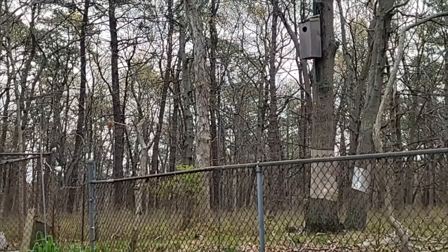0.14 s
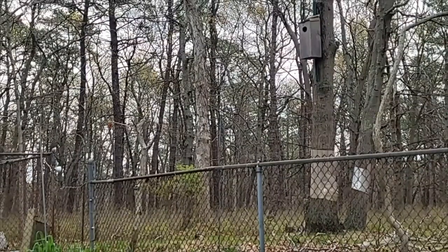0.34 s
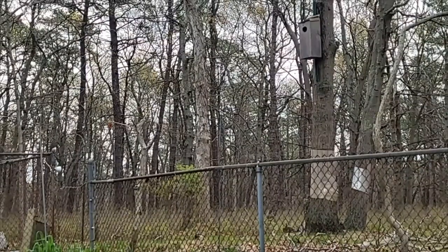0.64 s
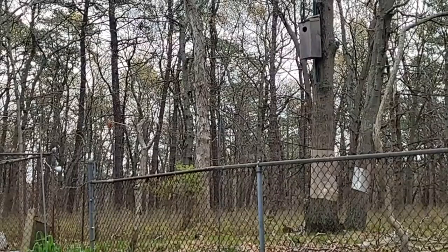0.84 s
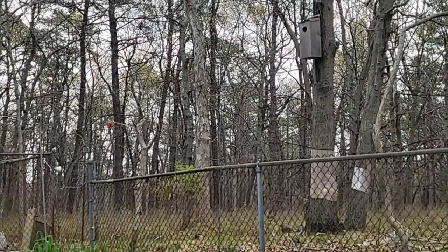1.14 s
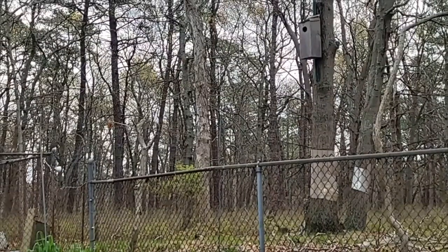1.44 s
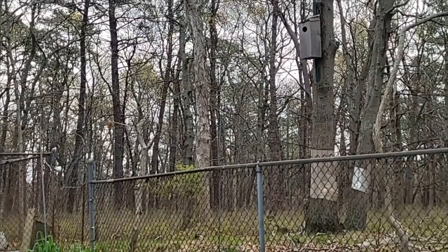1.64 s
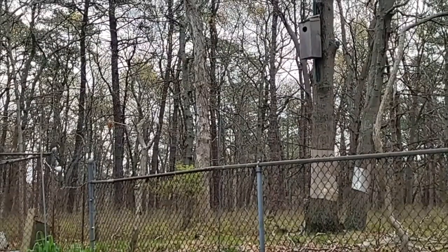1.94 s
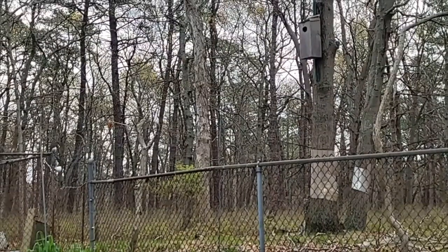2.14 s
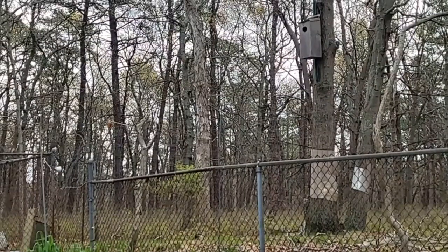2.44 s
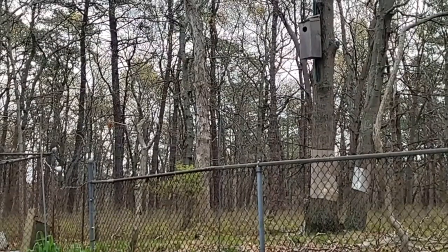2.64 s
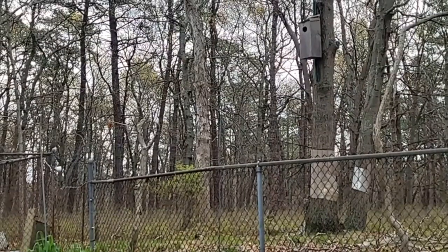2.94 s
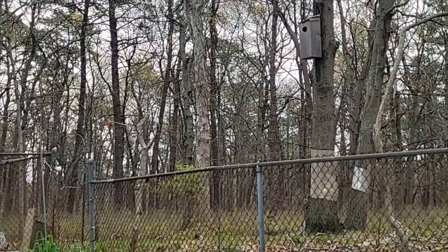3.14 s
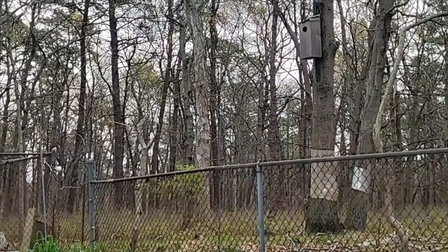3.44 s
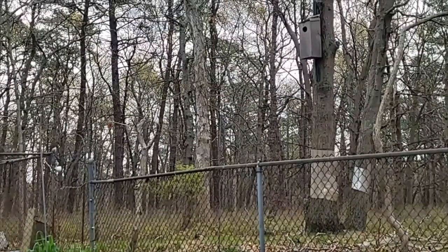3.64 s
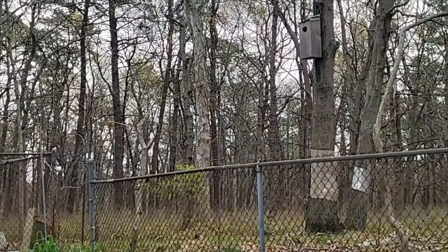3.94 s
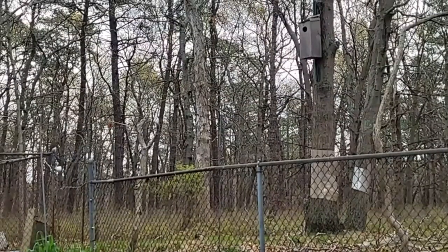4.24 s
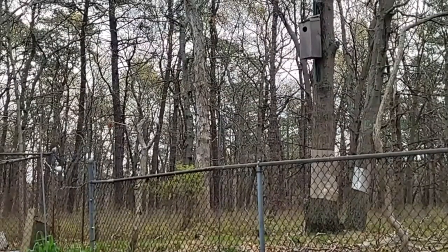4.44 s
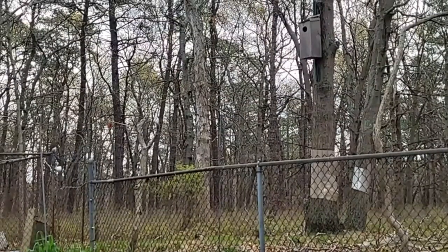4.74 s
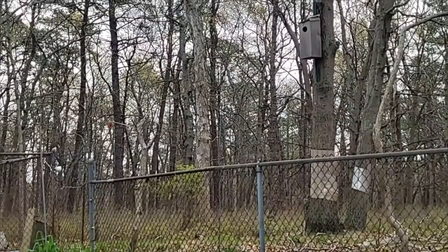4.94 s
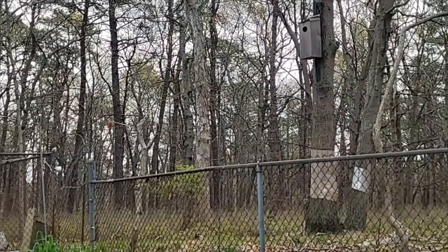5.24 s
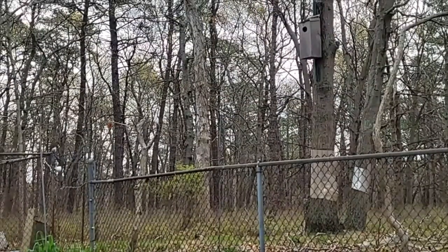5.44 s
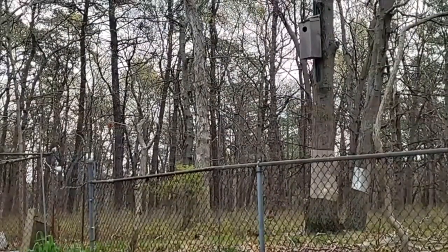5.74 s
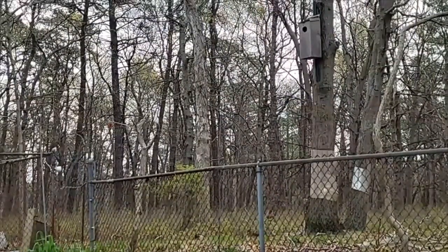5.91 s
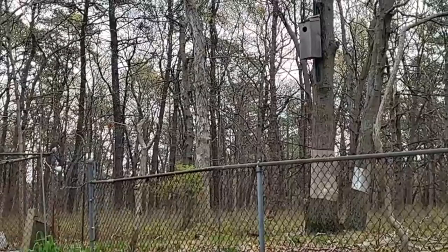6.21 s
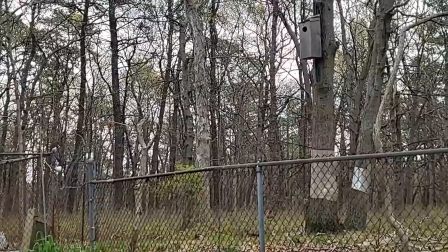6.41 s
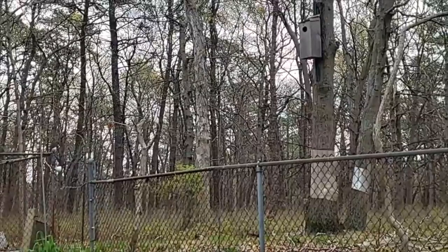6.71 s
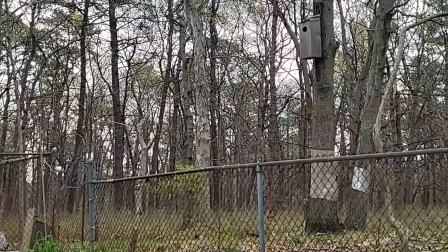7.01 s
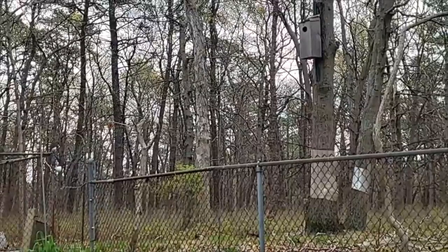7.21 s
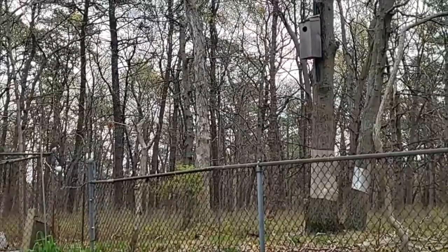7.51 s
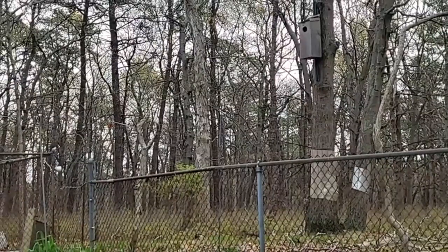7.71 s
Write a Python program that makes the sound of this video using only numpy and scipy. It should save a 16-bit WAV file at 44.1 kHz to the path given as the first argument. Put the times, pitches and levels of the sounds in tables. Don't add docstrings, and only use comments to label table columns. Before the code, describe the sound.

Outdoors in woods, a songbird repeats a fast, clear whistled phrase about twice a second, blurred by tree echoes. Two small metallic clicks sound near the microphone early on. The song stops and a second bird chips faintly and steadily. Later the song returns while cloth brushes dry leaves close by, with snaps, ticks and dull knocks on the recorder. Low road rumble, a distant machine hum and faint hiss continue throughout.

```python
import sys
import numpy as np
from scipy import signal
from scipy.fft import rfft, irfft, next_fast_len
from scipy.io import wavfile
from scipy.ndimage import uniform_filter1d, map_coordinates

SR = 44100
rng = np.random.default_rng(int(sys.argv[2]) if len(sys.argv) > 2 else 0)


def pcm_store(signal):
    levels = np.round(np.clip(np.atleast_2d(signal), -1, 1) * 32767)
    wavfile.write(sys.argv[1], SR, levels.astype(np.int16).T)


def volts_from_db(level):
    exponent = np.asarray(level, float) / 20
    return 10 ** exponent


N = 347061

# start_s, swoop_db, high_db, held_db, fall_db
SONG_PHRASES = [(-.085, -79.5, -70, -67, -66), (.385, -72, -64.5, -62, -66), (.853, -67, -62.5, -62.5, -66),
                (1.321, -66.5, -61, -62, -64.5), (5.142, -85, -75, -68, -66.5),
                (5.613, -65, -62.5, -64.5, -69), (6.083, -64.5, -64.5, -62.5, -66.5),
                (6.550, -65, -63, -61, -68)]
# after_start_s, pitch_hz, level_db
HOOK_NOTE = [(0, 4400, -8), (.011, 5400, -6), (.018, 5460, -4), (.032, 5430, -8)]
STROKE_NOTES = [
    [(.022, 5150, -8), (.036, 4850, -8)],
    [(.038, 4750, -7), (.058, 4250, -2), (.078, 3880, -1.5)],
    [(.072, 4520, -4), (.084, 4230, -2), (.098, 3800, -3)],
    [(.085, 3650, -4), (.094, 3320, -2), (.112, 3100, -4)],
    [(.096, 3780, -2), (.106, 3540, 1), (.126, 3200, -4)],
]
HIGH_NOTE = [(.15, 3620, -3), (.159, 3610, 2), (.17, 3560, -3), (.184, 3520, -13)]
HELD_NOTE = [(.196, 2670, -18), (.222, 2722, -2), (.24, 2738, -6), (.265, 2748, 2), (.28, 2750, -2)]
FLICK_NOTES = [
    [(.298, 3300, -4), (.306, 3050, 0), (.316, 2850, -3)],
    [(.316, 3250, -5), (.326, 2980, -2), (.338, 2800, -5)],
]
FALL_NOTE = [(.342, 2570, -3), (.354, 2480, 3.5), (.385, 2345, 0), (.415, 2265, -1.5), (.44, 2225, -4.5),
             (.46, 2195, -12)]
OVERTONE_DB = -32
SWOOP_FLUTTER_DB, SWOOP_ECHO_DB, SWOOP_TAIL_DB, SWOOP_RING = 3, -4, 3, 1
SONG_FLUTTER_DB, SONG_ECHO_DB, SONG_TAIL_DB, SONG_RING = 3.6, -5, -4.5, 1
FLICK_DB, FALL_DB, FALL_FLUTTER_DB = -5.5, -7.3, 3.5

# delay_s, level_db
TRUNK_ECHOES = [(.009, -11), (.03, -11), (.062, -10), (.09, -10), (.14, -8)]
# freq_hz, t60_s
WOODS_DECAY = [(2200, .8), (2750, 1.1), (3600, .98), (5000, 1.05), (9000, 0.36)]
SWAY_S, LEAF_RATE_HZ = .00005, 260

# freq_hz, density_db_per_hz
ROAD_SPECTRUM = [(12, -55), (20, -31), (35, -11), (50, -3), (66, -1.5), (164, -8.5), (191, -14),
                 (261, -15.5), (318, -18.5), (442, -26), (800, -26.5), (1940, -49.5), (2100, -65.5),
                 (2730, -86), (4620, -120)]
# time_s, level_db
WASH_LEVEL = [(0, -62), (.1, -58.5), (.45, -61), (.9, -60.5), (2, -61), (2.7, -60.5), (3.05, -61.5),
              (3.15, -62.5), (3.35, -61), (3.9, -59.5), (4.8, -61), (5.4, -59), (5.6, -56), (5.8, -56.5),
              (5.95, -60.5), (6.4, -61.5), (7.35, -60), (7.47, -64), (7.87, -60.5)]
# freq_hz, width_hz, level_db
ENGINE_TONES = [(69.54, 16, -57), (109.7, 5.4, -63.5), (263.4, 7, -68.5), (312.7, 8, -71.5)]
WASH_DB, RUMBLE_DB, RUMBLE_GROWS = .9, -54, .8
LORRY_DB, LORRY_T60_S, LORRY_HZ, LORRY_WIDTH_HZ = -45, 4.5, 69, 22

# time_s, pitch_hz, level_db, third_multiple_db
HUM_TRACK = [(0, 158.5, -62, -78), (1.3, 158, -60, -76), (2.5, 157.8, -66, -78), (2.85, 157.4, -57, -78),
             (3.4, 156.8, -57, -71), (3.6, 156, -54, -78), (4.25, 155.3, -49.5, -71),
             (4.8, 155.4, -56, -78), (5.1, 155.5, -52, -74), (5.65, 155.4, -44, -65),
             (6.14, 154.8, -60, -76), (6.42, 153.8, -61, -62), (6.6, 153, -57, -73),
             (7.15, 152.7, -53, -71), (7.45, 152.8, -63, -78), (7.69, 152.6, -50, -73),
             (7.87, 152.8, -54, -73)]
# freq_hz, density_db_per_hz
AIR_SPECTRUM = [(1180, -29), (2000, -1), (2440, -7), (2610, -5), (2910, -8), (3970, -5), (4550, -10),
                (6920, -3), (7530, -7), (9910, -9), (11500, -13), (12800, -7.5), (14300, -11), (15500, -19)]
AIR_DB = -85.5

# start_s, length_s, centre_hz, width_hz, level_db
CLOTH_BRUSHES = [(0, .07, 4100, 600, -82), (.26, .1, 6500, 4000, -83), (.725, .05, 6850, 500, -80),
                 (.824, .012, 3100, 900, -68), (2.32, .36, 6950, 1500, -91), (2.3, .55, 12500, 4000, -94),
                 (4.208, .028, 4200, 1800, -75.5), (4.868, .135, 3800, 900, -70.5),
                 (4.9, .06, 4500, 600, -76), (4.86, .12, 6500, 2000, -80), (7.44, .06, 3400, 450, -84),
                 (7.41, .09, 6700, 2000, -82), (7.615, .05, 6300, 2500, -81), (7.72, .14, 6800, 2200, -80),
                 (7.855, .014, 9000, 9000, -73)]
# freq_hz, density_db_per_hz
CLOTH_SPECTRUM = [(710, -26), (1200, 0.5), (1300, -4), (1540, -9.5), (1940, -11.5), (2260, -12.5),
                  (3390, -8), (5300, -10), (7180, -4.5), (8830, -22.5), (13000, -13), (14400, -23.5)]
# start_s, peak_db, centre_hz
LEAF_SNAPS = [(7.259, -57, 9000), (5.456, -51, 7000), (5.885, -53, 2000), (5.368, -50, 3900),
              (4.5328, -52, 7640), (5.4455, -50, 2990), (5.5194, -54, 7200), (5.7513, -37, 12500),
              (5.7694, -43, 3570), (6.828, -45, 2750), (7.0983, -51, 2750), (7.6196, -57, 6330),
              (7.799, -47, 7240)]
SNAP_T60_S = .055
# start_s, peak_db, centre_hz, t60_s
HOUSING_KNOCKS = [
    (5.445, -49.5, 650, .03),
    (5.61, -57, 900, .03),
    (5.752, -49, 600, .03),
    (5.934, -47, 1100, .03),
    (5.9432, -36, 780, .035),
]
NEAR_TOP_HZ = 14300

# start_s, length_s, from_hz, to_hz, level_db
THIN_CALLS = [(.012, .053, 3560, 3490, -80), (3.412, .035, 7450, 6450, -74), (5.28, .085, 3560, 3450, -79),
              (5.715, .04, 7300, 7150, -77), (5.752, .03, 6750, 6650, -72), (4.26, .022, 3580, 3530, -92),
              (4.6, .02, 2720, 2760, -91), (4.65, .03, 2640, 2630, -91), (4.655, .03, 5400, 5230, -86),
              (6.656, .03, 7300, 6600, -68)]
# length_share, top_pitch_share, level_db
ARCH_SHAPE = [(0, .96, -2), (.32, 1.001, 0), (.62, .966, 1.5), (1, .928, -1.5)]
# start_s, length_s, top_hz, level_db
ARCHED_CALLS = [
    (1.413, .079, 7920, -75),
    (5.822, .081, 7500, -72),
]
# after_start_s, pitch_hz, level_db
CHIP_NOTE = [(0, 5750, 0), (.006, 5350, 2.5), (.016, 4950, 3.5), (.03, 4680, 1), (.042, 4330, -3)]
# start_s, level_db
CHIP_TIMES = [(1.018, -78), (1.172, -80), (1.512, -80), (1.668, -74), (1.833, -79), (1.988, -77.5),
              (2.129, -74), (2.284, -75), (2.431, -73.5), (2.583, -74), (2.739, -74.5), (2.893, -75.5)]

# start_s, level_db, t60_s, hiss_db, hiss_t60_s
CLASP_CLICKS = [
    (.360, -52, 0.046, -26, 0.6),
    (0.466, -47.5, 0.052, -28, 0.45),
]
# freq_hz, level_db, t60_s
CLASP_MODES = [(3278, -59, 1.2), (4350, -27, 0.23), (5170, -19, 0.14), (5460, 3.5, 0.019),
               (6557, -26, 0.088), (7897, -16, 0.089), (8600, -28, 0.11), (9900, -28, 0.078),
               (12060, -30, 0.11), (12320, -19, 0.017), (12700, -27, 0.08), (14060, -19, 0.13)]
# freq_hz, density_db_per_hz
CHATTER_SPECTRUM = [(880, -71), (1500, -37), (2190, -16.5), (3420, -16.5), (5040, -4.5), (6260, -12),
                    (7640, -6.5), (8320, -18), (8800, -12.5), (14400, -15)]

# peak_s, peak_db, rise_20db_s, fall_20db_s, brightness_db
LEAF_MOVES = [(4.53, -90, .025, .2, 7), (4.74, -85, .25, .25, 9), (4.87, -76, .03, .4, 12),
              (5, -84, .2, .1, 8), (5.33, -80, .35, .3, 2.5), (5.46, -71, .1, .1, 6),
              (5.76, -66, .13, .08, 11), (5.72, -75, .3, .9, 5), (6.07, -70.5, .9, .36, 1.5),
              (6.83, -76, .015, .03, 12), (6.94, -77, .25, .25, 1.5), (7.04, -71, .03, .045, 11),
              (7.09, -71, .06, .04, 12), (7.28, -89, .15, .1, 6), (7.63, -89, .04, .3, 5),
              (7.82, -83, .3, .6, 5)]
# start_s, peak_db, centre_hz
TWIG_TICKS = [(4.8145, -58, 7000), (4.8534, -55, 12800), (4.8758, -57, 13000), (4.9512, -59, 7500),
              (5.0171, -56, 6500), (5.087, -60, 3000), (5.1767, -60, 6440), (5.192, -62, 7000),
              (5.2475, -60, 7010), (5.4226, -58, 5000), (5.6057, -60, 2200), (5.6806, -52, 6000),
              (5.9432, -54, 5000), (6.0467, -52, 6200), (6.3091, -59, 6200), (6.9197, -52, 4500),
              (6.997, -60, 4000), (7.036, -54, 7000)]
TICK_T60_S, TICK_AFTER_DB, TICK_AFTER_T60_S, TICK_BROAD = .014, -12, .04, .5

# from_s, to_s, pressure_before, pressure_after
LOST_SOUND = [
    (.23903, .25429, -.0042, -.0043),
    (2.24435, 2.25429, -.0027, -.0008),
    (4.24960, 4.25429, -.002, -.0098),
    (7.23635, 7.25429, -.0017, .0008),
]


def unit(x):
    return x / np.sqrt(np.mean(x ** 2) + 1e-20)


def along(points, hz):
    f, v = np.transpose(points)
    return np.interp(np.log(hz + 1), np.log(f + 1), v)


def curves(rows):
    s, *cols = np.transpose(rows)
    return [np.interp(np.arange(N) / SR, s, c) for c in cols]


def wobble(rate_hz):
    coarse = np.arange(0, N + 16, 16)
    knots = rng.standard_normal(int(N * rate_hz / SR) + 4)
    return np.interp(np.arange(N), coarse, map_coordinates(knots, [coarse * rate_hz / SR]))


def filtered(x, response):
    m = next_fast_len(len(x) + 8192)
    return irfft(rfft(x, m) * response(np.fft.rfftfreq(m, 1 / SR)), m)[:len(x)]


def noise(count, response):
    return filtered(rng.standard_normal(count), response)


def spectrum(points):
    return lambda f: volts_from_db(along(points, f))


def hump(centre_hz, width_hz):
    return lambda f: 1j * f * width_hz / (centre_hz ** 2 - f * f + 1j * f * width_hz)


def new_track():
    return np.zeros(N + SR)


def add(track, s, sound):
    at = round((s + .5) * SR)
    track[at:at + len(sound)] += sound


def trimmed(track):
    return track[SR // 2:][:N]


def whistle(note, overtone_db, flutter_db):
    s, hz, db = np.transpose(note)
    t = np.arange(s[0], s[-1], 1 / SR)
    ends = np.clip(np.minimum(t - s[0], s[-1] - t) / .004, 0, 1)
    rows = np.repeat([[0], [1]], len(t), axis=1)
    gust = map_coordinates(rng.standard_normal((2, 40)), [rows, [(t - s[0]) * 140] * 2])
    glide_hz = uniform_filter1d(np.interp(t, s, hz), size=200)
    phase = 2 * np.pi * np.cumsum(glide_hz * (1 + .004 * gust[0])) / SR
    level = volts_from_db(np.interp(t, s, db) + flutter_db * gust[1])
    return np.sqrt(2) * ends * level * (np.sin(phase) + volts_from_db(overtone_db) * np.sin(2 * phase))


def woods(sound, echo_db, tail_db, ring, swell_s):
    hz, t, z = signal.stft(rng.standard_normal(SR // 2 + 8000), SR, nperseg=256)
    decay = volts_from_db(-60 * t / (ring * along(WOODS_DECAY, hz)[:, None]))
    tail = signal.istft(z * decay * (1 - np.exp(-t / swell_s)), SR, nperseg=256)[1]
    answer = volts_from_db(tail_db) * tail / np.linalg.norm(tail)
    for s, db in TRUNK_ECHOES:
        answer[round((s + rng.normal(0, .0004)) * SR)] += volts_from_db(db + echo_db)
    k = np.arange(len(sound))
    flicker = map_coordinates(rng.standard_normal(500), [k * LEAF_RATE_HZ / SR])
    swayed = np.interp(k + SWAY_S * SR * flicker, k, sound)
    heard = signal.fftconvolve(swayed, answer)
    heard[:len(sound)] += sound
    return heard


def songbird():
    track = new_track()
    for start, swoop_db, high_db, held_db, fall_db in SONG_PHRASES:
        away, facing = np.zeros((2, SR))
        away_notes = [(note, swoop_db - 4.5, SWOOP_FLUTTER_DB) for note in [HOOK_NOTE, *STROKE_NOTES]]
        away_notes += [(note, fall_db + FLICK_DB, SWOOP_FLUTTER_DB) for note in FLICK_NOTES]
        away_notes += [(FALL_NOTE, fall_db + FALL_DB, FALL_FLUTTER_DB)]
        for note, db, flutter_db in away_notes:
            add(away, note[0][0], volts_from_db(db) * whistle(note, OVERTONE_DB, flutter_db))
        for note, db in [(HIGH_NOTE, high_db), (HELD_NOTE, held_db)]:
            add(facing, note[0][0], volts_from_db(db - 3) * whistle(note, OVERTONE_DB, SONG_FLUTTER_DB))
        away, facing = away[SR // 2:], facing[SR // 2:]
        add(track, start, woods(away, SWOOP_ECHO_DB, SWOOP_TAIL_DB, SWOOP_RING, swell_s=.004))
        add(track, start, woods(facing, SONG_ECHO_DB, SONG_TAIL_DB, SONG_RING, swell_s=.012))
    return trimmed(track)


def traffic():
    wash_db, = curves(WASH_LEVEL)
    rumble_db = RUMBLE_DB + RUMBLE_GROWS * (wash_db - wash_db.mean())
    road = spectrum(ROAD_SPECTRUM)
    split = lambda f: 1 / (1 + (f / 190) ** 6)
    rumble = unit(noise(N, lambda f: road(f) * np.sqrt(split(f))))
    wash = unit(noise(N, lambda f: road(f) * np.sqrt(1 - split(f))))
    tones = np.zeros(N)
    for hz, width_hz, db in ENGINE_TONES:
        tones += volts_from_db(db) * unit(noise(N, lambda f: hump(hz, width_hz)(f) ** 2))
    t = np.arange(2 * SR) / SR
    lorry = unit(noise(len(t), lambda f: hump(LORRY_HZ, LORRY_WIDTH_HZ)(f) ** 2))
    tones[:len(t)] += volts_from_db(LORRY_DB - 60 * t / LORRY_T60_S) * lorry
    rumble *= volts_from_db(rumble_db + 2.4 * wobble(7.8))
    wash *= volts_from_db(wash_db + WASH_DB + 1.2 * wobble(5))
    return rumble + wash + tones


def hum():
    hz, db, third_db = curves(HUM_TRACK)
    phase = 2 * np.pi * np.cumsum(hz + 1.6 * wobble(12)) / SR
    first = volts_from_db(db - .8 + 1.7 * wobble(14)) * np.sin(phase)
    third = volts_from_db(third_db - 4 + 2.4 * wobble(9)) * np.sin(3 * phase)
    return np.sqrt(2) * (first + third)


def air():
    hiss = unit(noise(N, spectrum(AIR_SPECTRUM)))
    return volts_from_db(AIR_DB + 1.1 + 0.17 * wobble(9)) * hiss


def cloth_brushes():
    track = new_track()
    for s, length, hz, width_hz, db in CLOTH_BRUSHES:
        stroke = np.linspace(0, 1, round(length * SR))
        band = noise(len(stroke), lambda f: hump(hz, width_hz)(f) ** 2)
        rough_db = 3 * uniform_filter1d(rng.standard_normal(len(band)), size=100) * 10
        add(track, s, volts_from_db(db) * unit(band * volts_from_db(rough_db)) * np.sin(np.pi * stroke) ** 0.81)
    return trimmed(track)


def far_birds():
    track = new_track()
    for s, db in CHIP_TIMES:
        scatter = [rng.normal(.92, 0.035), rng.normal(.99, 0.008), 1]
        chip = whistle(np.multiply(CHIP_NOTE, scatter), overtone_db=-42, flutter_db=1.6)
        add(track, s, volts_from_db(db - 3) * woods(chip, echo_db=-10, tail_db=2, ring=0.43, swell_s=0.0016))
    calls = [[(s, a, db), (s + length, b, db)] for s, length, a, b, db in THIN_CALLS]
    calls += [np.multiply(ARCH_SHAPE, [length, hz, 1]) + [s, 0, db] for s, length, hz, db in ARCHED_CALLS]
    for note in calls:
        call = whistle(note, overtone_db=-37, flutter_db=2.0)
        add(track, note[0][0], woods(call, echo_db=-22, tail_db=-5.5, ring=0.52, swell_s=.01))
    return trimmed(track)


def clasp():
    track, t = new_track(), np.arange(SR // 3) / SR
    for s, db, t60, hiss_db, hiss_t60 in CLASP_CLICKS:
        slips = 1 + 1.9 * np.sin(np.pi * 750 * t + 1.6 * np.sin(2 * np.pi * 90 * t)) ** 8
        decay = volts_from_db(-60 * t / t60) + volts_from_db(hiss_db - 60 * t / hiss_t60)
        shape = (1 - np.exp(-t / 0.0019)) ** 2 * decay
        chatter = unit(filtered(rng.standard_normal(len(t)) * slips, spectrum(CHATTER_SPECTRUM)))
        ring = np.zeros(len(t))
        for hz, level, life in CLASP_MODES:
            ring += volts_from_db(level + rng.normal(0, 2) - 60 * t / min(life, .12)) * np.sin(2 * np.pi * hz * t)
        add(track, s, volts_from_db(db + 10) * (shape * chatter + ring * (1 - np.exp(-t / .004))))
    return trimmed(track)


def rustle():
    t, loud, soft = np.arange(N) / SR, np.zeros(N), np.zeros(N)
    for s, db, rise, fall, bright_db in LEAF_MOVES:
        stroke = volts_from_db(db - 20 * np.maximum((s - t) / rise, (t - s) / fall))
        loud = np.hypot(loud, stroke)
        soft = np.hypot(soft, volts_from_db(-bright_db) * stroke)
    clumps_db = 1.1 * wobble(60) + 1.6 * wobble(400) + .6 * wobble(14)
    grains = rng.standard_normal(N) * volts_from_db(clumps_db)
    ticks = (rng.random(N) < 50 / SR) * rng.exponential(3.5, N)
    full = filtered(grains + ticks, spectrum(CLOTH_SPECTRUM))
    bright = filtered(full, lambda f: (f > 8200) * 1.)
    return (loud * bright + soft * (full - bright)) * volts_from_db(.8) / np.std(bright)


def leaf_snaps():
    track, t = new_track(), np.arange(SR // 6) / SR
    for s, db, hz in LEAF_SNAPS:
        decay = volts_from_db(-60 * t / .006) + volts_from_db(-4 - 60 * t / SNAP_T60_S)
        crack = rng.standard_normal(len(t)) * decay * (1 - np.exp(-t / 0.00038))
        crack = filtered(crack, lambda f: volts_from_db(along(CLOTH_SPECTRUM, f)) * (0.14 + abs(hump(hz, 2500)(f))))
        add(track, s, volts_from_db(db - 8.5) * crack / np.max(abs(crack)))
    return trimmed(track)


def twigs():
    track, t = new_track(), np.arange(SR // 20) / SR
    for s, db, hz in TWIG_TICKS:
        decay = volts_from_db(-60 * t / TICK_T60_S) + volts_from_db(TICK_AFTER_DB - 60 * t / TICK_AFTER_T60_S)
        colour = lambda f: volts_from_db(.7 * along(CLOTH_SPECTRUM, f)) * (TICK_BROAD + abs(hump(hz, 2500)(f)))
        crack = filtered(rng.standard_normal(len(t)) * decay, lambda f: colour(f) * (f > 2200))
        add(track, s, volts_from_db(db - 2.5) * crack / np.max(abs(crack)))
    return trimmed(track)


def housing_knocks():
    track, t = new_track(), np.arange(SR // 6) / SR
    for s, db, hz, t60 in HOUSING_KNOCKS:
        push = rng.standard_normal(len(t)) * volts_from_db(-60 * t / t60) * .35
        push[0] = 4
        body = lambda f: hump(hz, 380)(f) + .25 * hump(1700, 1200)(f)
        knock = filtered(push, lambda f: body(f) / (1 + 1j * f / 2100) ** 4)
        add(track, s, volts_from_db(db) * knock / np.max(abs(knock)))
    return trimmed(track)


def scene():
    near = cloth_brushes() + clasp() + rustle() + leaf_snaps() + twigs() + housing_knocks()
    near = filtered(near, lambda f: f < NEAR_TOP_HZ)
    return (songbird() + traffic() + hum() + air() + far_birds() + near)[None]


def top_cut(x):
    return signal.sosfilt(signal.butter(12, 15610, fs=SR, output="sos"), x)


def record(dry):
    x, k = dry[0].copy(), np.arange(N)
    for from_s, to_s, before, after in LOST_SOUND:
        a, b = round(from_s * SR), round(to_s * SR)
        x += (before - x[a - 1]) * np.exp(-((k - a) / 90) ** 2) * (k < a)
        x += (after - x[b]) * np.exp(-((k - b) / 90) ** 2) * (k >= b)
        x[a:b] *= volts_from_db(-70)
    return top_cut(x[None])


dry = scene()
out = record(dry)
pcm_store(out)
```